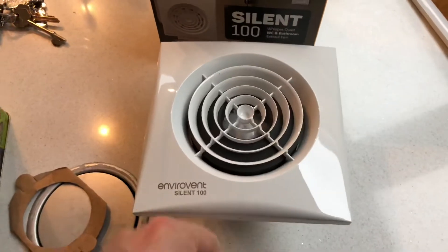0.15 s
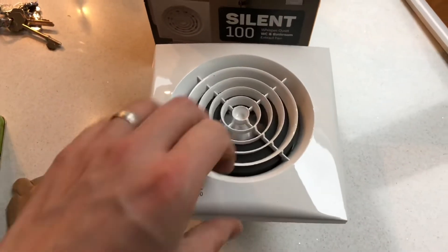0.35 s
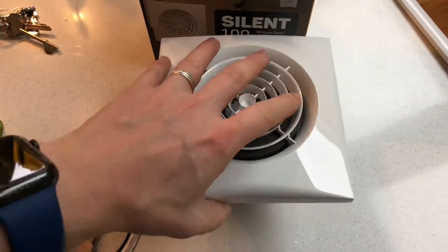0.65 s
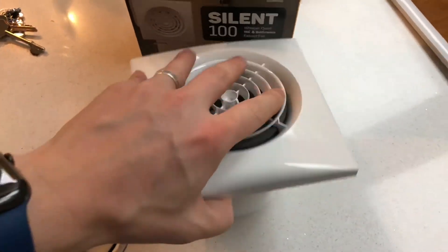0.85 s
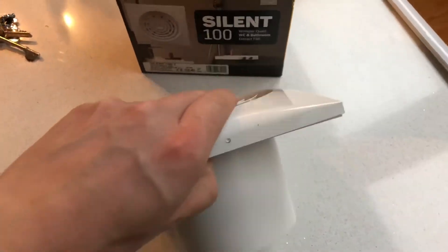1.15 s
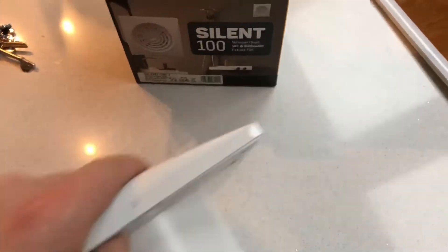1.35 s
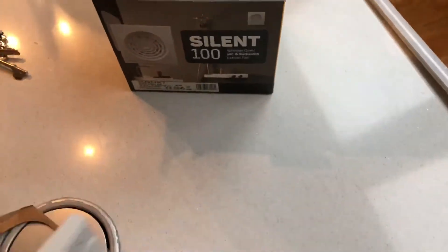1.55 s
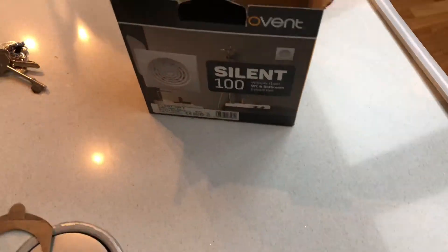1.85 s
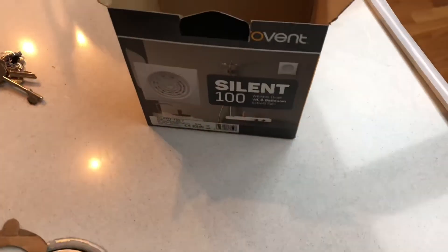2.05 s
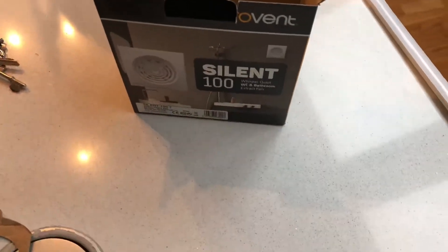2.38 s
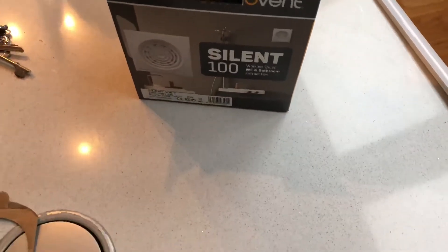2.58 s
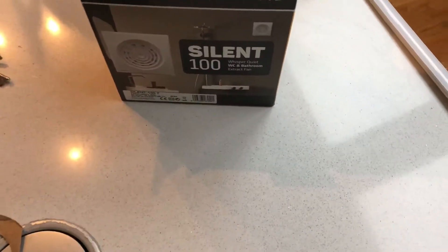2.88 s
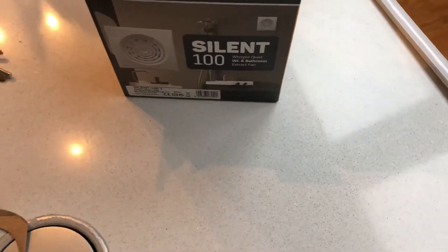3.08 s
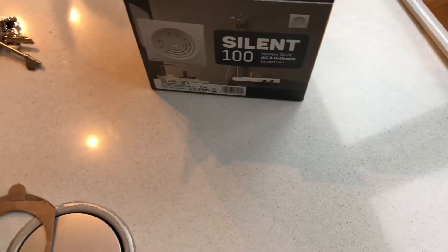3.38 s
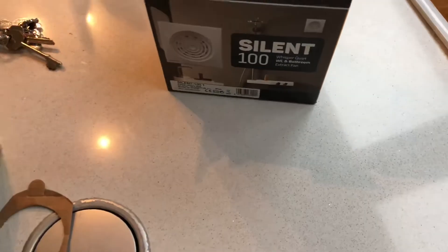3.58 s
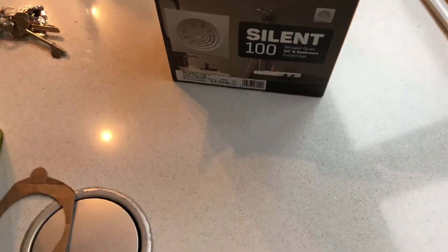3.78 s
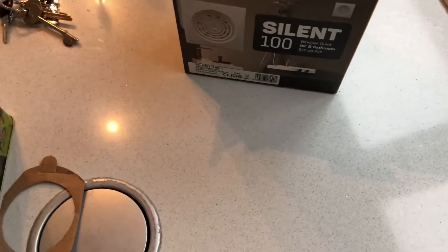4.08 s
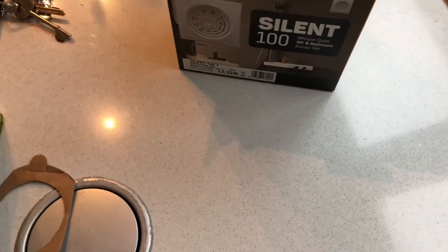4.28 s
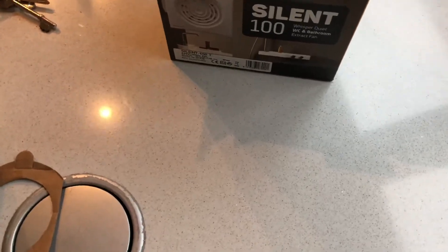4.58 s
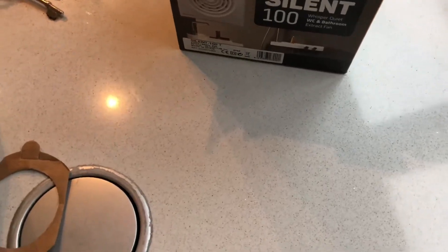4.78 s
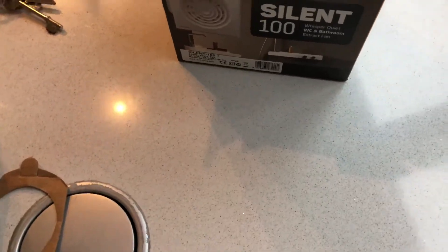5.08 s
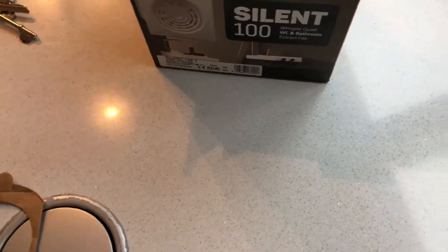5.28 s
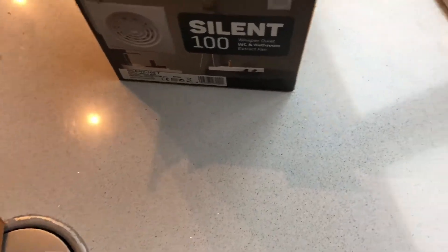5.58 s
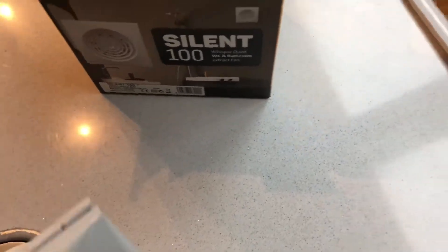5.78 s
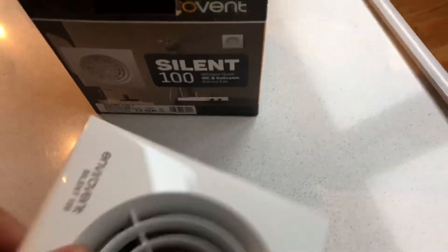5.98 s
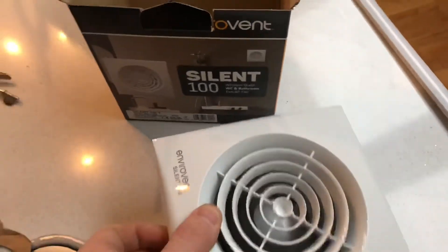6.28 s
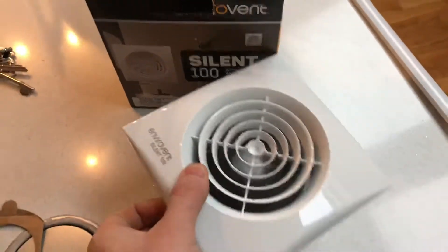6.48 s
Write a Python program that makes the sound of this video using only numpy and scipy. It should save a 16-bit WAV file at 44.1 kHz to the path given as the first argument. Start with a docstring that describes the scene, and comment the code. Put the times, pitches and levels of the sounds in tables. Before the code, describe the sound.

Close to one microphone in a hard-walled kitchen, fingers rub a thin plastic fan cover, with soft scuffs and a breathy squeak. A hollow knock comes at one second, then uneven clusters of sharp snaps and clacks as the cover is pulled off. Near the end the piece is set down with a bright click and a duller knock. Faint steady room hush throughout.

```python
"""Sharp clicks, knocks and scrapes, as hands press, twist and pull a plastic cover off a small fan body
above a stone worktop in a kitchen. Clips snap and parts knock: noise bursts and dying modes of the thin
plate, the hollow duct and the whole body. Fingers and plastic rub in between: grainy noise through the
same modes, dry hiss, short noise puffs, breathy squeaks and faint ringing. A hard-walled room answers the
blows and puffs by sparse echoes, over a faint steady hush, at one microphone."""
import sys
import numpy as np
from scipy import signal
from scipy.fft import rfft, irfft, next_fast_len
from scipy.io import wavfile
from scipy.ndimage import uniform_filter1d, map_coordinates

SR = 44100
rng = np.random.default_rng(int(sys.argv[2]) if len(sys.argv) > 2 else 0)


def inscribe(sig):
    """Save sig as 16-bit PCM at rate SR to the path in sys.argv[1].

    A 1-D sig is mono; a 2-D sig holds one channel per row.
    Samples are clipped to [-1, 1] before scaling.
    """
    pcm = np.round(np.clip(np.atleast_2d(sig).T, -1, 1) * 32767)
    wavfile.write(sys.argv[1], SR, pcm.astype(np.int16))


N = 292682

# modes of the hollow duct: pitch_hz, t60_s
DUCT_MODES = [(350, 0.059), (432, 0.034), (500, 0.026), (586, 0.029), (700, 0.037), (815, 0.037)]
# modes of the thin cover plate: pitch_hz, t60_s
PLATE_MODES = [(975, 0.0047), (1075, 0.013), (1260, 0.014), (1430, 0.022), (1610, 0.022), (1770, 0.022),
               (2000, 0.0061), (2390, 0.0047), (2800, 0.02)]


def hits():
    """Impact excitation: a few milliseconds of chattering contact crack, then drive plate, duct and body."""
    # clicks and knocks; each pitch is the one its modes favour: start_s, plate_peak_db, plate_pitch_hz,
    # duct_peak_db, duct_pitch_hz, crack_peak_db, thud_peak_db, thud_pitch_hz
    blows = [(0.1047, -51, 1790, -52.5, 530, -51, -58, 79), (0.9754, -21.5, 880, -14, 553, -26.5, -33, 246),
             (1.701, -17, 880, -36, 780, -47, -39, 233), (1.703, -11, 910, -17.5, 476, -15, -38.5, 228),
             (1.7452, -28.5, 1470, -65, 519, -33, -46, 279),
             (1.852, -26.5, 930, -20.5, 450, -30, -38.5, 275), (1.864, -39, 1200, -32, 460, -32, -46, 140),
             (2.0582, -18.5, 1820, -24.5, 417, -25.5, -31.5, 152),
             (2.0671, -37, 1600, -26, 760, -23.5, -37, 101), (2.079, -22, 1344, -26, 504, -30, -34, 105),
             (2.096, -29, 1750, -26.5, 433, -28.5, -52, 283),
             (2.105, -24.5, 954, -23, 830, -40, -39.5, 119), (2.129, -33, 930, -26.5, 855, -45, -55, 119),
             (2.786, -35.5, 1070, -31.5, 525, -40, -40, 251),
             (2.8755, -25.5, 1340, -26.5, 523, -33, -36.5, 220),
             (3.386, -41, 1120, -68, 470, -44, -52, 191),
             (3.4126, -28.5, 1450, -29.5, 430, -34.5, -40.5, 270),
             (3.4295, -34, 1610, -35.5, 437, -48, -45, 93.5),
             (3.687, -9, 1490, -19.5, 633, -16, -36.5, 282), (3.7155, -22, 1016, -29, 890, -26.5, -78, 202),
             (4.145, -42, 1060, -49.5, 525, -53, -61, 158.5),
             (4.7525, -30.5, 1530, -37.5, 650, -49, -51, 280),
             (4.7611, -28.5, 1510, -35.5, 450, -37, -49, 258),
             (4.812, -17, 1595, -29, 600, -26.5, -42, 183), (4.918, -31, 1410, -40.5, 580, -43, -55, 274),
             (4.9432, -33.5, 1910, -44, 497, -49.5, -48.5, 183),
             (5.0469, -31, 1640, -30.5, 550, -46, -43.5, 169),
             (5.2725, -8, 1300, -26, 610, -15.5, -31, 166), (5.292, -17, 1980, -24, 577, -20.5, -62.5, 268),
             (5.328, -18, 1800, -23, 580, -16, -49, 210), (5.4177, -18, 1220, -21.5, 604, -24.5, -45, 280),
             (5.5203, -20.5, 1170, -25, 497, -26.5, -40, 294),
             (6.3453, -21.5, 2380, -37.5, 690, -51, -28, 250), (6.3497, -16, 1270, -25, 482, -26, -60, 229),
             (6.563, -22, 1380, -18.5, 553, -26, -20, 183), (6.577, -34, 1290, -29, 557, -46, -21, 120)]
    # modes of the whole body on the worktop: pitch_hz, t60_s
    thud_modes = [(80, 0.064), (113, 0.064), (140, 0.059), (185, 0.064), (231, 0.11), (280, 0.073)]
    # spectrum of a crack before its treble tilt: frequency_hz, relative_level_db
    crack_spectrum = [(1500, -2), (2800, 8), (6000, -1), (10000, -10), (16500, -33.5)]
    contact_ms = 3.37
    # A blow whose crack stands out over the plate is harder and brighter;
    # a stiffer, higher spot of the plate cracks brighter too.
    base_tilt_db, tilt_per_crack_db, tilt_per_pitch_octave_db = 7.5, 0.22, 6  # tilts in dB per octave
    out = np.zeros(N)
    t = np.arange(1024) / SR
    contact = t * 1000 / contact_ms
    chatter = contact * np.exp(-2 * contact)
    bass_cut = signal.butter(2, 300., "high", fs=SR)
    for s, plate_db, plate_hz, duct_db, duct_hz, crack_db, thud_db, thud_hz in blows:
        push_noise, crack_noise = rng.standard_normal((2, 1024))
        duct_signs, thud_signs = rng.choice([-1., 1.], (2, 6))

        tilt_db = base_tilt_db + tilt_per_crack_db * (crack_db - plate_db)
        tilt_db += tilt_per_pitch_octave_db * np.log2(plate_hz / 1350)
        colour = [(hz, db + tilt_db * np.log2(hz / 5000)) for hz, db in crack_spectrum]
        add(out, s, gain_of(crack_db) * crack(crack_noise, colour))

        # uneven pushes, in step with the plate
        slips = chatter ** 3 * (np.sin(2 * np.pi * plate_hz * t) + 3.25 * push_noise)
        plate = signal.fftconvolve(slips, ring(PLATE_MODES, 1, plate_hz, 10.0, 0.00005))
        plate = signal.lfilter(*bass_cut, plate)  # a thin plate radiates no bass
        add(out, s, gain_of(plate_db) * peaked(plate))

        # the bigger parts answer later and more softly
        duct = ring(DUCT_MODES, duct_signs, duct_hz, 21.0, 2.1 / duct_hz)
        add(out, s + 0.98 / duct_hz, gain_of(duct_db) * peaked(duct))
        thud = ring(thud_modes, thud_signs, thud_hz, 13.8, 0.0012)
        add(out, s + 0.003, gain_of(thud_db) * peaked(thud))
    return out


def crack(noise, colour):
    """Frequency-dependent damping: a noise burst rises quickly and its treble dies first."""
    rise_ms, fall_ms, treble_fall_ms = 0.76, 3.06, 2.11
    treble_hz, treble_db = 5630, -3.5
    ms = np.arange(len(noise)) * 1000 / SR
    low = signal.lfilter(*signal.butter(2, treble_hz, fs=SR), noise)
    treble = gain_of(treble_db) * (noise - low)
    dying = low * np.exp(-ms / fall_ms) + treble * np.exp(-ms / treble_fall_ms)
    return peaked(coloured((1 - np.exp(-ms / rise_ms)) * dying, colour))


def ring(modes, signs, near_hz=None, focus_db=30., rise_s=0.00065):
    """Modal superposition: damped sines, those near the pitch of the struck spot favoured (dB per octave)."""
    t = np.arange(SR // 5)[:, None] / SR
    hz, t60 = np.transpose(modes)
    off_db = 0 if near_hz is None else -focus_db * abs(np.log2(hz / near_hz))
    waves = signs * gain_of(off_db - 60 * t / t60) * np.sin(2 * np.pi * hz * t)
    return waves.sum(1) * (1 - np.exp(-t[:, 0] / rise_s))


def puffs():
    """Band-shaped noise bursts: each puff is centred on one pitch; low ones last longer."""
    # brief puffs of noise, low or bright: faint knocks, scuffs and the bright edges of some blows:
    # start_s, peak_db, centre_hz
    bursts = [(0.564, -38, 6800), (.612, -37, 616), (.63, -43, 590), (0.635, -58, 2000), (0.681, -44, 470),
              (1.8, -40, 10500), (1.865, -39, 8000), (2, -35.5, 480), (2.03, -37, 7000),
              (2.121, -28.5, 430), (2.1204, -35, 8700), (2.148, -47, 850), (2.245, -44, 860),
              (2.269, -46, 1270), (2.418, -57, 1800), (2.52, -46, 736), (2.629, -62, 9100),
              (2.632, -53, 540), (2.698, -40.5, 990), (2.758, -41, 517), (2.798, -40, 4500),
              (2.96, -42.5, 9100), (3.124, -46.5, 5200), (3.536, -42, 593), (3.569, -43.5, 500),
              (3.709, -33, 1490), (3.739, -32, 850), (3.761, -35, 1360), (4.0094, -45.5, 780),
              (4.159, -49, 1420), (4.242, -49, 1160), (4.323, -54.5, 1100), (4.965, -42, 5000),
              (0.862, -52, 1450), (5.182, -58, 1480), (5.268, -27.5, 6040), (5.7505, -52, 2500),
              (5.842, -53, 2230), (5.975, -53, 1260), (6.3454, -21, 5850), (6.369, -32.5, 1380),
              (6.61, -37, 6900), (6.63, -38.5, 4000)]
    fixed_rise_ms, rise_cycles = 0.9, 2.2  # the rise is their sum, the cycles being those of the pitch
    slope_db = 14.  # fall per octave off the centre
    out = np.zeros(N)
    for s, peak_db, hz in bursts:
        u = np.arange(1024) / SR / (fixed_rise_ms / 1000 + rise_cycles / hz)  # time in rises
        puff = u * np.exp(-u) * rng.standard_normal(1024)
        colour = [(hz / 16, -4 * slope_db), (hz, 0), (hz * 16, -4 * slope_db)]
        add(out, s, gain_of(peak_db) * peaked(coloured(puff, colour)))
    return out


def rub():
    """Friction-driven resonance: grainy noise with tiny catches excites duct and plate and adds dry hiss."""
    # the rubbed duct sounds lower as the hand closes over it: time_s, pitch_hz
    duct_pitch = [(.56, 570), (.62, 640), (0.688, 507), (.78, 472), (1.1, 576), (2.698, 507), (3.3, 570),
                  (3.441, 415), (3.703, 595), (5.102, 529)]
    # spectrum of the dry hiss: frequency_hz, relative_level_db
    hiss_spectrum = [(1060, -31), (1800, -11), (10300, -20), (15300, -35.5), (16500, -43)]
    clumps = evened(smoothed(rng.standard_normal(N), 300))
    # about 70 catches a second, of random strength
    catches = (rng.random(N) < 70. / SR) * np.minimum(rng.exponential(1, N), 2.5)
    catches = uniform_filter1d(catches, size=60) * 60
    grit = gain_of(2.0 * clumps) * (1 + .55 * catches)

    duct_hz = np.interp(np.arange(N) / SR, *np.transpose(duct_pitch))
    duct = rubbed(DUCT_MODES, grit, duct_hz, 40.0, wander_db=3.5)
    plate = rubbed(PLATE_MODES, grit, 890.0, 12.0, wander_db=3.0)
    hiss = coloured(rng.standard_normal(N) * grit, hiss_spectrum)
    hiss = evened(patchy(hiss, 3.5))
    return (pressure() * [duct, plate, hiss]).sum(0)


def pressure():
    """Incoherent addition: strokes swell, hold and fade; their powers add in duct, plate and hiss."""
    # strokes of skin and plastic: full_pressure_s, held_s, swell_s, fade_s, duct_level_db,
    # plate_relative_to_duct_db, hiss_relative_to_duct_db
    strokes = [(0.001, 0.12, 0.013, 0.025, -68.5, -2.5, 3.5),
               (.567, 0.0062, 0.0034, 0.013, -44.5, -14, -12.5),
               (0.566, 0.063, .002, 0.023, -58.5, -4.5, 6.5), (0.604, 0.072, 0.018, 0.13, -50, -13.5, -4),
               (0.989, 0.0085, 0.11, 0.09, -41.5, -12.5, -3), (1.071, 0.091, 0.043, 0.14, -55.5, -2, 0.5),
               (1.601, 0.097, 0.22, 0.045, -77.5, 2.5, 8), (1.73, .004, 0.041, 0.047, -49.5, -11, -5),
               (1.771, 0.063, 0.084, 0.02, -52, -4, 6), (1.92, 0.21, 0.11, 0.11, -54, 2, -0.5),
               (1.874, 0.0041, 0.036, 0.033, -39.5, -3.5, -7), (2.16, 0.003, 0.33, 0.032, -60, -21, 5),
               (2.2, 0.085, 0.046, 0.11, -60, 1.5, -2), (2.6, 0.18, 0.25, .1, -59, -3, -3.5),
               (2.771, .03, 0.047, 0.18, -46.5, -1.5, -8.5), (2.841, 0.032, 0.021, 0.17, -48, -0.5, -1.8),
               (3.08, 0.085, 0.17, 0.16, -59, -0.8, -2.5), (3.31, 0.051, 0.14, 0.078, -56, -1.5, -7),
               (3.39, 0.025, 0.05, 0.099, -51, 4, 0.2), (3.57, 0.0037, 0.44, 0.074, -60, -10.5, -2.5),
               (3.635, 0.0023, 0.051, 0.08, -38.5, -0.5, -11), (3.7, 0.066, 0.013, 0.42, -62, 7.5, 0),
               (4.501, 0.1, 0.25, 0.15, -68, 0.5, -1.5), (4.78, 0.0034, 0.11, 0.054, -54, -1.5, -6),
               (4.964, 0.0037, 0.04, 0.094, -57, 4, 3), (5.09, 0.56, 0.47, 0.25, -61, 1.1, -3.5),
               (5.7, 0.69, 0.1, 0.086, -70.5, -3.5, -4), (6.45, 0.069, 0.48, 0.083, -63.5, -10, -5.5),
               (6.58, .06, 0.032, .1, -54, -21, 1.5)]
    span_db = 20  # change over one swell or fade time
    t, power = np.arange(N) / SR, np.zeros((3, N))
    for s, held_s, swell_s, fade_s, duct_db, plate_db, hiss_db in strokes:
        away = np.maximum(s - t, 0) / swell_s + np.maximum(t - s - held_s, 0) / fade_s
        relative_db = np.array([[0], [plate_db], [hiss_db]])
        power += gain_of(duct_db - span_db * away + relative_db) ** 2
    return np.sqrt(power)


def rubbed(modes, grit, near_hz, focus_db, wander_db):
    """Modal coupling: each mode is caught on its own, now and then, most often near the favoured pitch."""
    out = np.zeros(N)
    for mode in modes:
        noise, drift = rng.standard_normal((2, N))
        drift = evened(smoothed(drift, 700))
        share = gain_of(wander_db * drift - focus_db * abs(np.log2(mode[0] / near_hz)))
        out += signal.oaconvolve(noise * grit * share, ring([mode], 1))[:N]
    # even out the level over half a second
    return out / np.sqrt(uniform_filter1d(out ** 2, size=SR // 2, mode="reflect"))


def patchy(x, patchy_db):
    """Spectral modulation: colour drifts in random patches as the contact wanders over ribs and edges."""
    z = signal.stft(x, nperseg=512, noverlap=384)[2]
    patches = uniform_filter1d(rng.standard_normal(z.shape), size=2, axis=0)  # across frequency
    patches = uniform_filter1d(patches, size=16, axis=1)  # across time
    z = z * gain_of(patchy_db * evened(patches))
    return signal.istft(z, nperseg=512, noverlap=384)[1][:len(x)]


def squeak():
    """Stick-slip oscillation: a gliding rate gives a rough tone with its octave."""
    # two breathy squeaks of fingers sliding on the grille, one falling, one steady:
    # time_s, pitch_hz, level_db
    glides = [
        [(0.85, 2565, -75), (0.93, 2400, -62.5), (1.02, 1980, -53.5), (1.07, 1900, -74.5)],
        [(0.99, 1550, -60.5), (1.09, 1564, -56), (1.14, 1597, -52), (1.2, 1540, -80)],
    ]
    out = np.zeros(N)
    for glide in glides:
        s, *columns = np.transpose(glide)
        t = np.arange(s[0], s[-1], 1 / SR)
        hz, level_db = (np.interp(t, s, c) for c in columns)
        turn = 2 * np.pi * np.cumsum(hz) / SR
        # slow random amplitudes make the tone rough
        a, b, c, d = smoothed(rng.standard_normal((4, len(hz))), 200)
        tone = a * np.cos(turn) + b * np.sin(turn)
        octave = c * np.cos(2 * turn) + d * np.sin(2 * turn)
        tone += 0.5 * (1560 / hz) ** 3 * octave
        add(out, s[0], gain_of(level_db) * evened(tone))
    return out


def ringing():
    """Narrow-band resonance: thin wavering tones swell and fade, each steady for about twenty cycles."""
    # faint ringing, low while the fan is carried back, high after it is set down; level changes
    # 20 dB over one swell or fade: pitch_hz, level_db, peak_s, swell_s, fade_s
    tones = [(290, -67.5, 6.09, 0.39, 0.5), (5700, -56, 6.35, 0.0044, 0.094)]
    t, out = np.arange(N) / SR, np.zeros(N)
    for hz, db, s, swell_s, fade_s in tones:
        a, b = uniform_filter1d(rng.standard_normal((2, N)), size=int(20 * SR / hz), axis=1)
        turn = 2 * np.pi * hz * t
        tone = evened(a * np.cos(turn) + b * np.sin(turn))
        away = np.maximum((s - t) / swell_s, (t - s) / fade_s)
        out += gain_of(db - 20 * away) * tone
    return out


def room(x):
    """Reverberation: sparse echoes of random sign, each band dying at its own speed."""
    # decay of the room by band: frequency_hz, t60_s, relative_level_db
    bands = [(102, 0.61, 4.5), (520, 0.39, 2), (1750, 0.55, -3), (4000, 0.5, -5), (13160, 0.15, -9)]
    taps = np.zeros(SR)
    at = np.arange(180, SR - 20, 20)  # one tap in every 20 samples
    taps[at + rng.integers(0, 20, len(at))] = rng.choice([-1., 1.], len(at))
    hz, t, z = signal.stft(taps, SR, nperseg=256)
    f, *columns = np.transpose(bands)
    t60, level_db = (np.interp(np.log(hz + 1), np.log(f), c)[:, None] for c in columns)
    tail = signal.istft(z * gain_of(level_db - 60 * t / t60), SR, nperseg=256)[1]
    return signal.fftconvolve(x, tail / np.linalg.norm(tail))[:N]


def smeared(x, depth):
    """Random time warp: blurs the pitch of the echoes by a share, for a smooth tail."""
    speed = evened(smoothed(rng.standard_normal(N), 500))
    shift = np.cumsum(depth * speed)
    shift = shift - uniform_filter1d(shift, size=2500)  # stay near the original time
    return map_coordinates(x, [np.arange(N) + shift], order=3, mode="nearest")


def hush():
    """Stationary noise: room and microphone noise of one steady spectrum."""
    # spectrum of the hush: frequency_hz, relative_level_db
    hush_spectrum = [(15, -30.5), (25, 7), (177, 5.5), (600, -2.5), (901, -7), (1900, -11.5),
                     (11300, -17.5), (14800, -23), (16500, -35.5)]
    level_db = -69
    return gain_of(level_db) * evened(coloured(rng.standard_normal(N), hush_spectrum))


def gain_of(db):
    """Logarithmic level: decibels to amplitude gain."""
    return 10 ** (np.asarray(db) / 20)


def evened(x):
    """Effective value: scales to rms 1."""
    return x / np.sqrt(np.mean(x ** 2) + 1e-20)


def peaked(x):
    """Peak value: scales to peak 1."""
    return x / (abs(x).max() + 1e-20)


def smoothed(x, size):
    """Low-pass averaging: two running means over a number of samples."""
    return uniform_filter1d(uniform_filter1d(x, size), size)


def coloured(x, points):
    """Linear filtering: weights the spectrum by (Hz, dB) points."""
    f, db = np.transpose(points)
    size = next_fast_len(len(x))
    hz = np.fft.rfftfreq(size, 1 / SR)
    gain = gain_of(np.interp(np.log(hz + 1), np.log(f), db))
    return irfft(rfft(x, size) * gain, size)[:len(x)]


def add(mix, s, sound):
    """Superposition: mixes a sound in at time s."""
    part = mix[round(s * SR):][:len(sound)]
    part += sound[:len(part)]


def scene():
    """Direct and reflected sound: two random room tails are crossfaded, so that the echoes vary."""
    echo_db = -15
    blows = hits() + puffs()
    turn = 2 * np.pi * 3.7 * np.arange(N) / SR  # phase of the crossfade
    echo = room(blows * np.cos(turn)) + room(blows * np.sin(turn))
    answered = blows + gain_of(echo_db) * smeared(echo, .025)
    return (answered + rub() + squeak() + ringing() + hush())[None]


def record(dry):
    """Band limitation: the microphone loses the deepest bass, the recorder the top treble."""
    edge_hz = 16100
    thin = signal.sosfilt(signal.butter(4, 42., "high", fs=SR, output="sos"), dry)
    band_limit = signal.firwin(511, edge_hz, window=("kaiser", 9), fs=SR)
    return signal.oaconvolve(thin, band_limit[None], "same")


dry = scene()
out = record(dry)
inscribe(out)
```